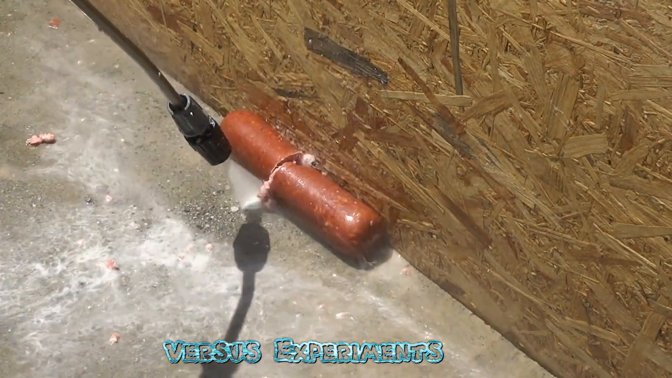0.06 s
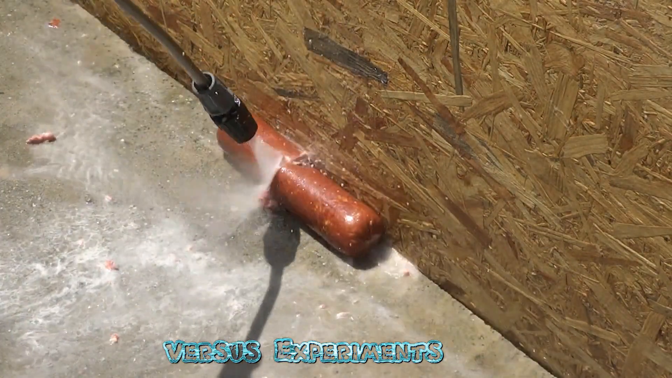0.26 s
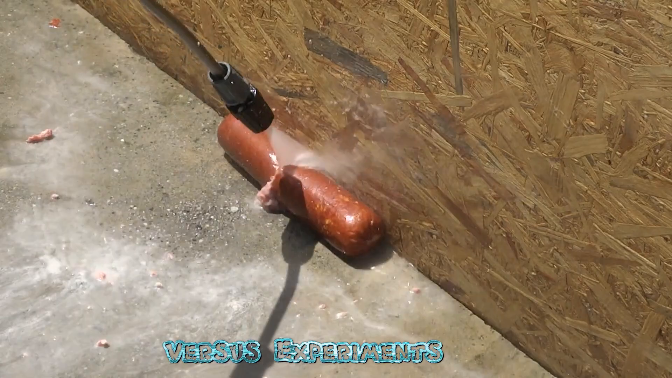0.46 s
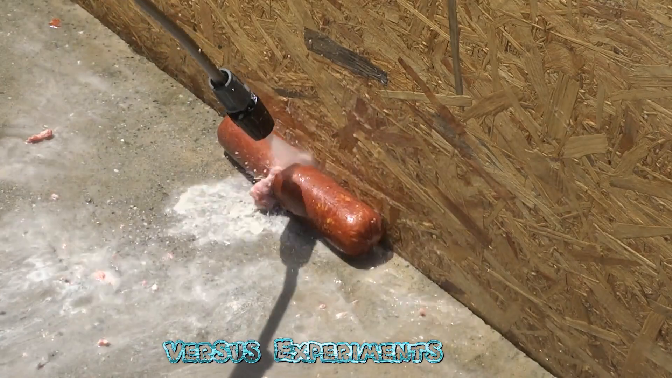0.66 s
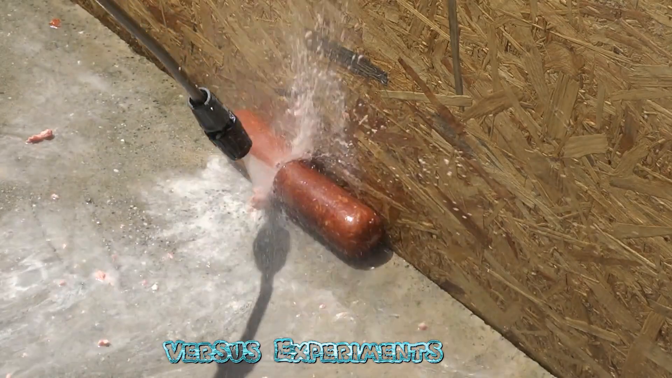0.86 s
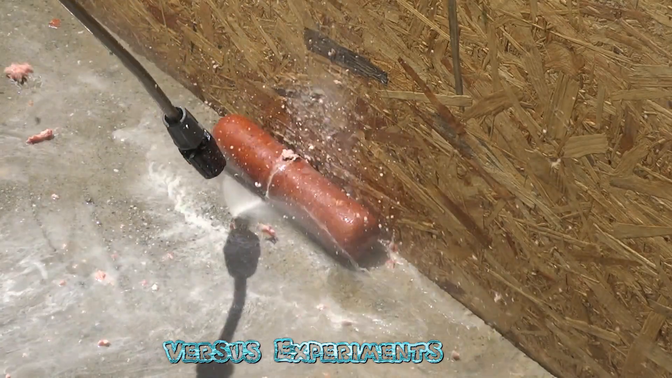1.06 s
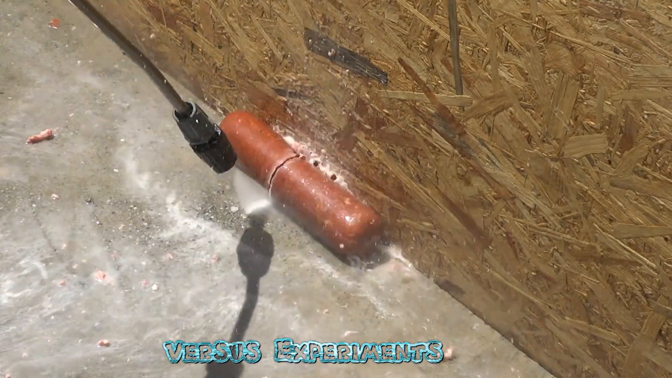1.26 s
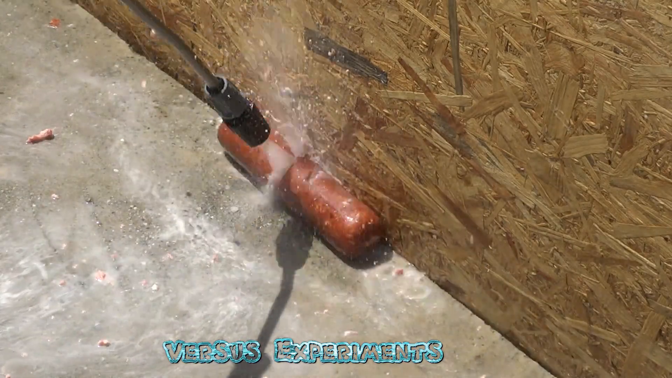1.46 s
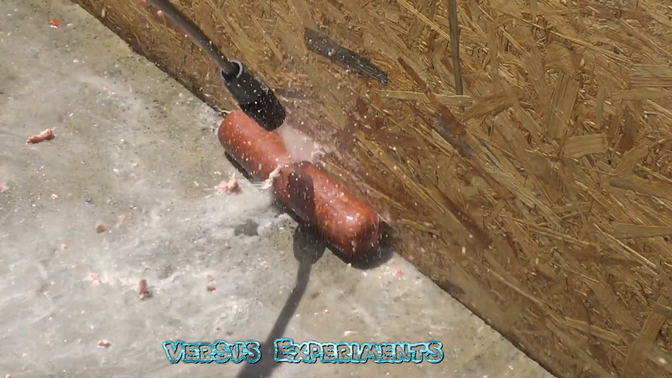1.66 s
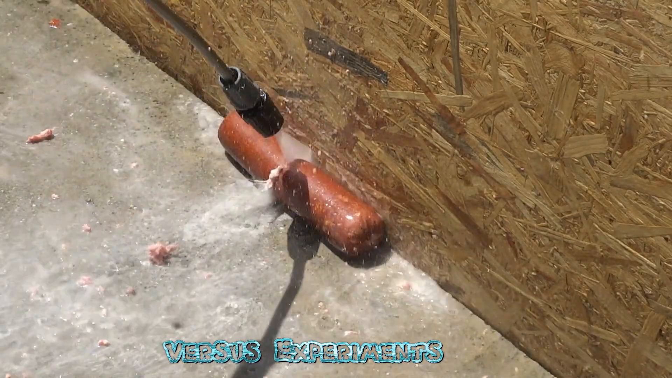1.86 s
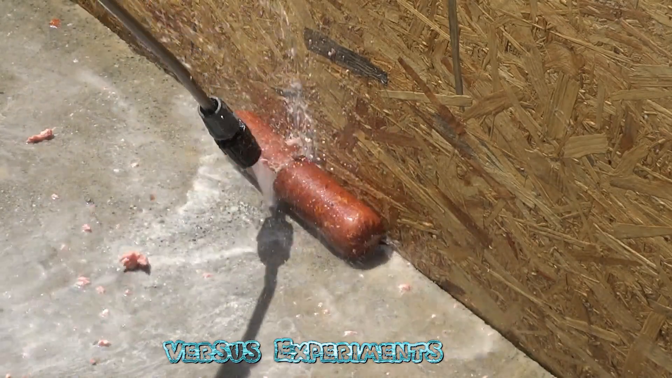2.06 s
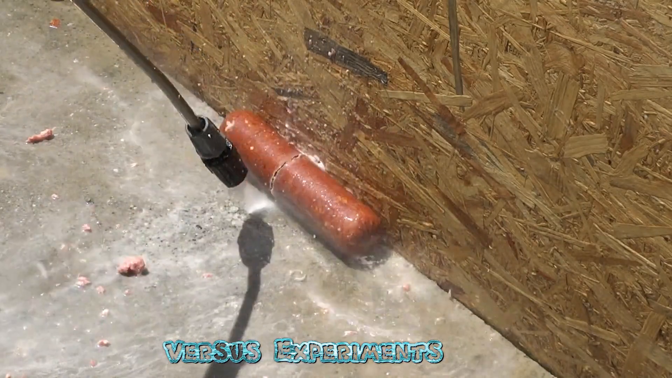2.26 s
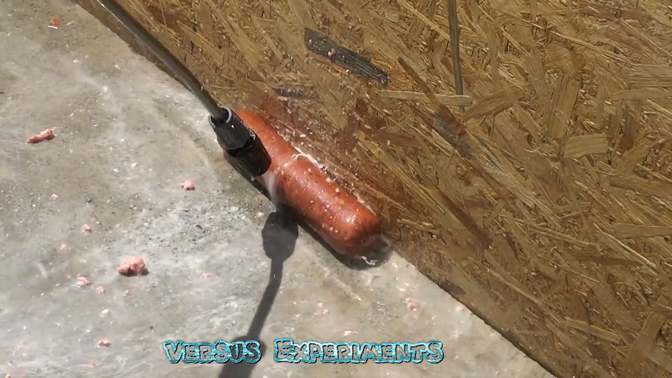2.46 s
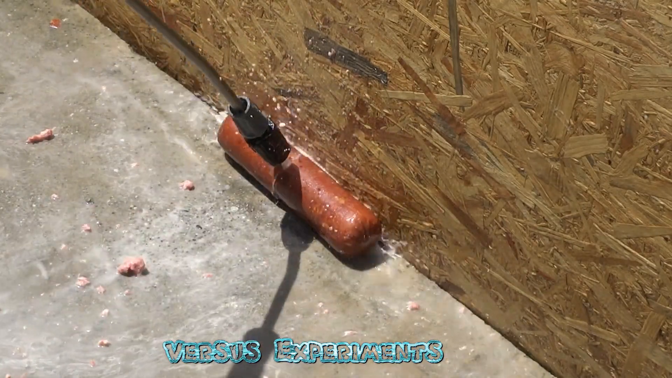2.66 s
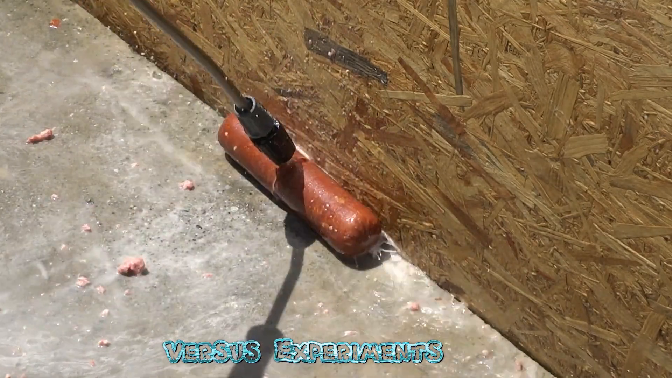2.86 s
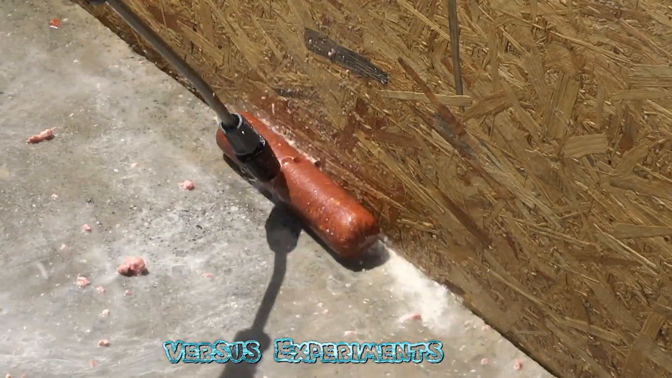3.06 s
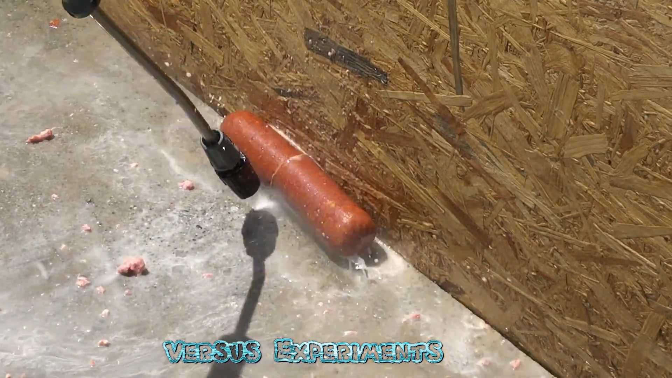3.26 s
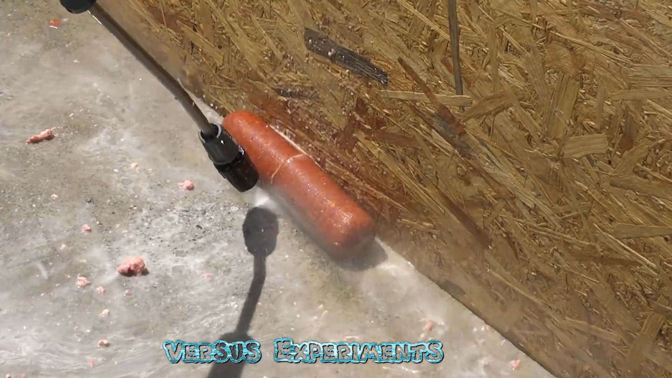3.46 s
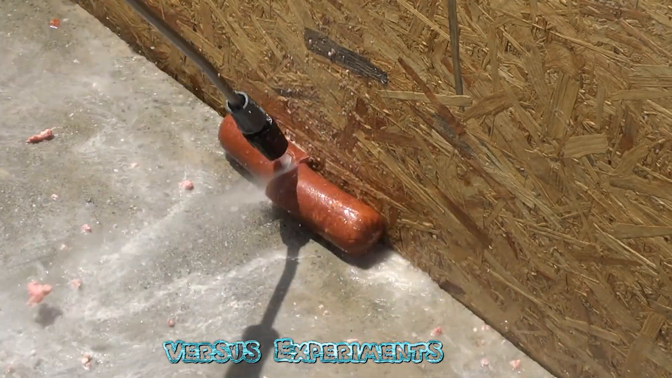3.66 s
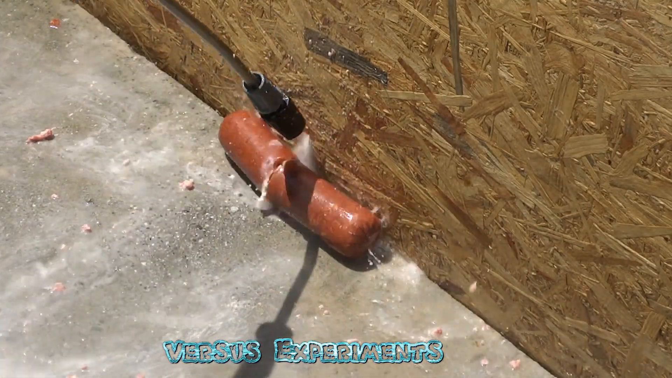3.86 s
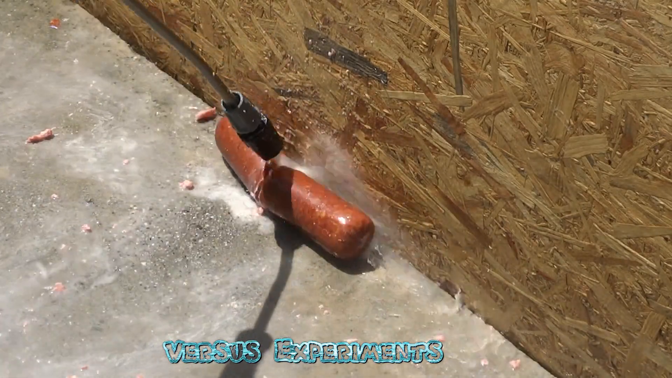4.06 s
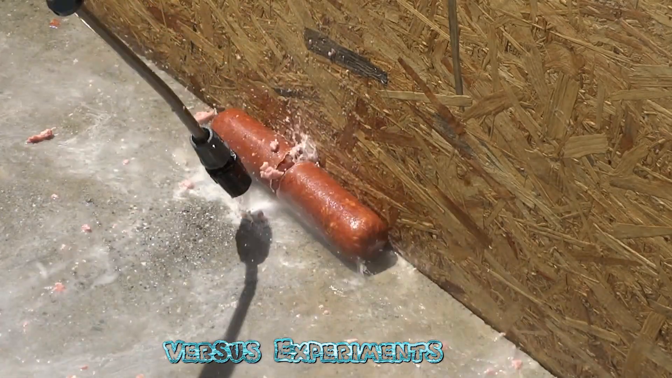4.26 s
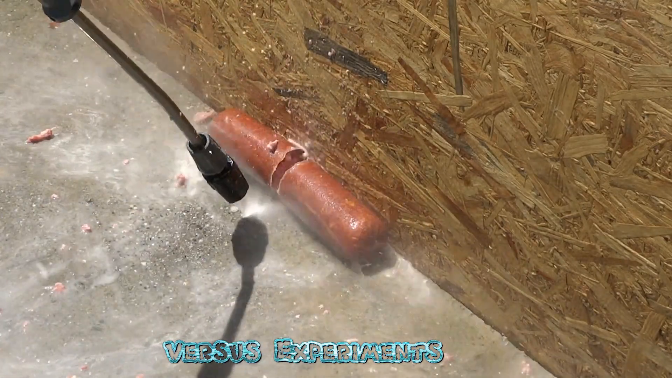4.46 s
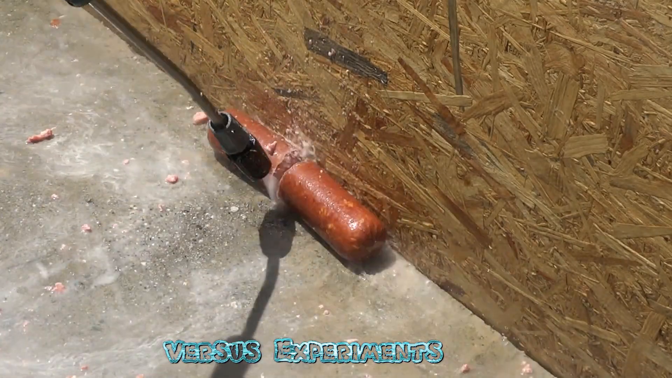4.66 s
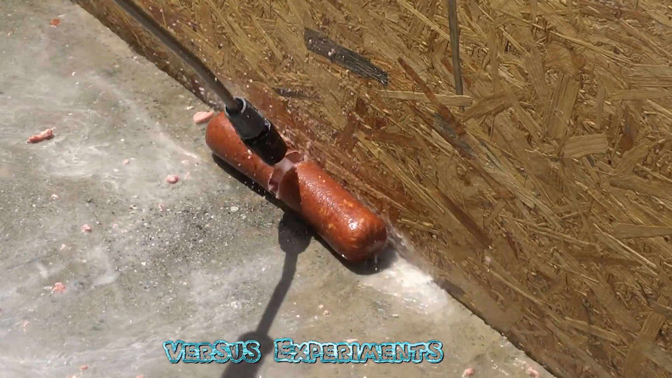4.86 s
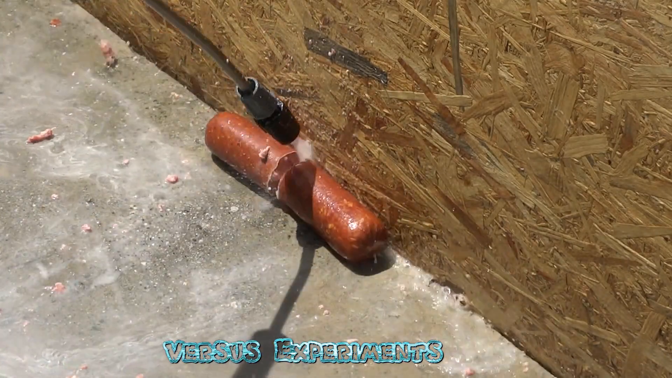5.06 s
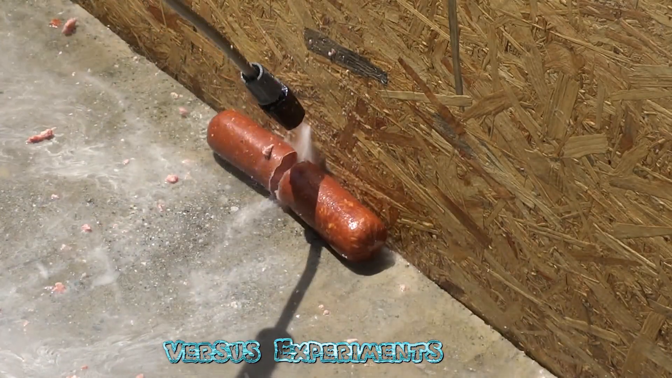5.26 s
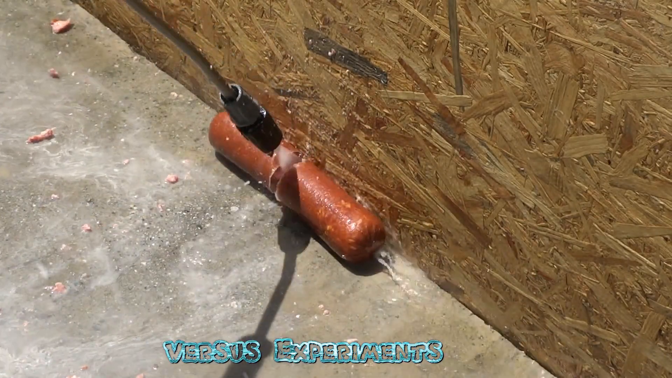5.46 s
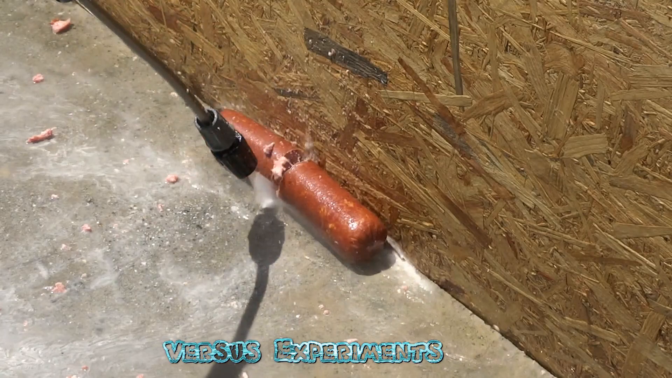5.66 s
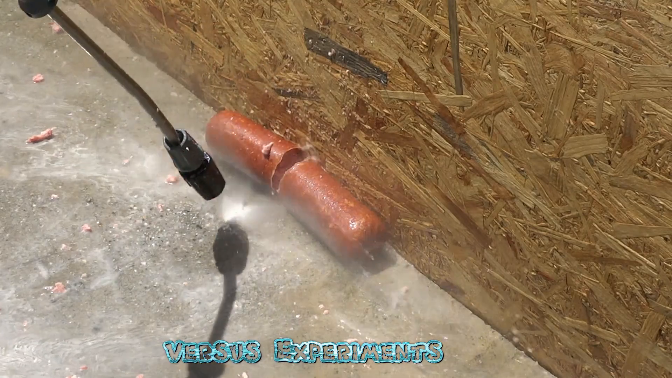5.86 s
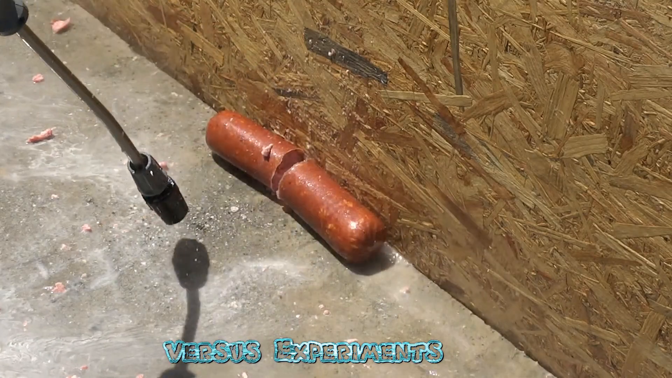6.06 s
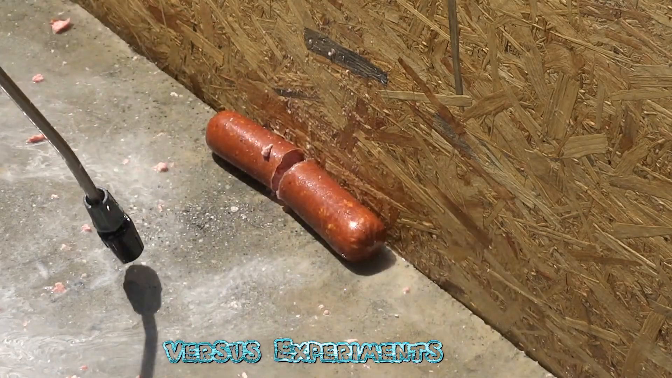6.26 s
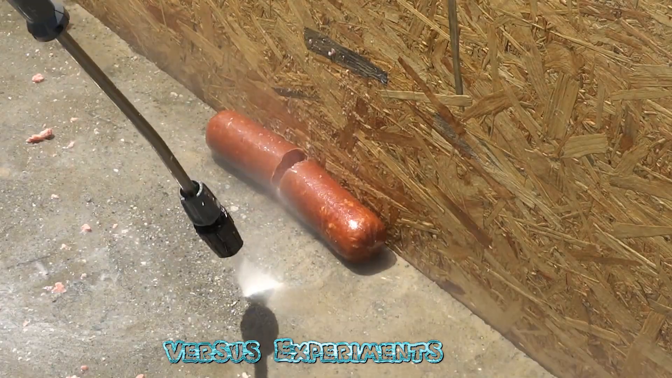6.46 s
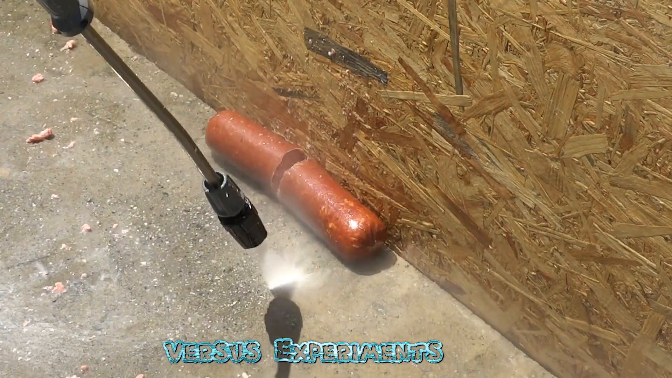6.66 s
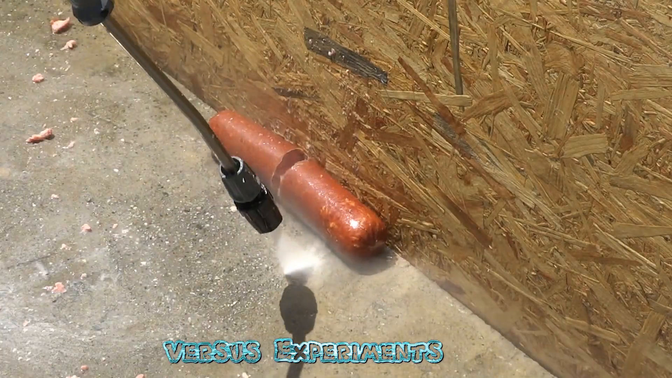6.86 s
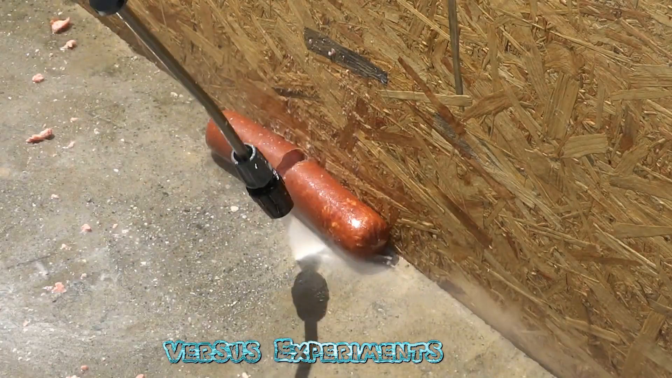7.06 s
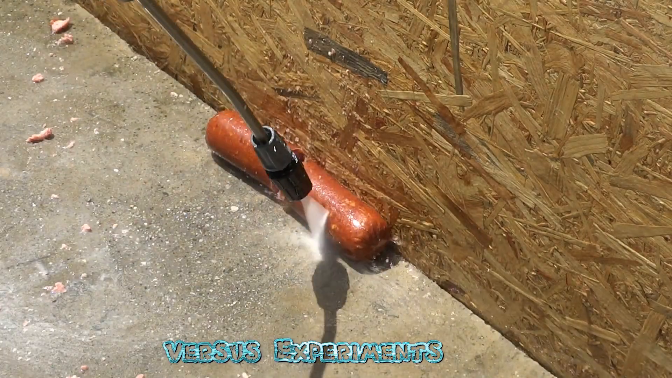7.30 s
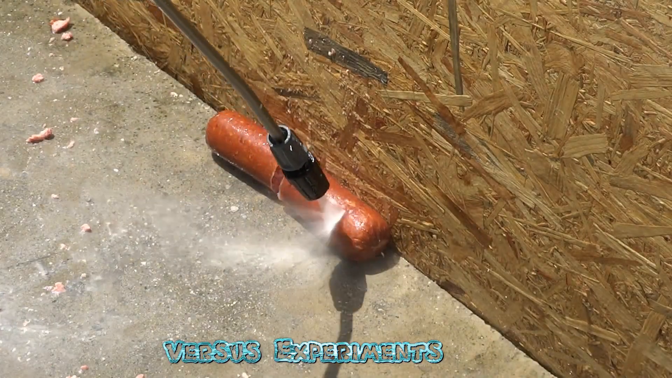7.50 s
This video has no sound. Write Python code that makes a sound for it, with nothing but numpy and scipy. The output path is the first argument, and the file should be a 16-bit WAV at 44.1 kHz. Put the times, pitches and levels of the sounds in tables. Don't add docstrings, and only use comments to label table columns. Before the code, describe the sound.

A pressure-washer jet roars hollowly into thick meat and hisses brightly on wet concrete, cuts off with a clack and faint birdsong, then snaps back.

```python
import sys
import numpy as np
from scipy import signal
from scipy.fft import irfft
from scipy.io import wavfile
from scipy.ndimage import uniform_filter1d

SR = 44100
rng = np.random.default_rng(int(sys.argv[2]) if len(sys.argv) > 2 else 0)


def pcm_store(signal):
    levels = np.round(np.clip(np.atleast_2d(signal), -1, 1) * 32767)
    wavfile.write(sys.argv[1], SR, levels.astype(np.int16).T)


def invert_db(x):
    u = np.asarray(x, float) / 20
    return 10 ** u


N = 332073
CONTROL_STEP = 40

# (frequency [Hz], density [dB per Hz])
HISS_SPECTRUM = [(1470, -31), (2500, -18), (2800, -18.5), (3190, -20), (3450, -10), (4210, -13),
                 (4540, -12.5), (6770, -4), (7420, -5.5), (8070, -2.5), (11500, -6.5), (13200, -14.5),
                 (15600, -13)]
# (frequency [Hz], density [dB per Hz])
ROAR_SPECTRUM = [(150, -66.5), (250, -22), (484, -24), (595, -14), (722, -15), (935, -6.5), (1020, -17),
                 (1200, -2), (1550, 3), (2810, -7.5), (3500, 1), (5500, -23), (7150, -40), (12100, -120)]
# (frequency [Hz], density [dB per Hz])
AIR_SPECTRUM = [(180, -35.5), (300, -9.5), (1030, -8), (1690, -4), (2100, -16.5), (3230, 2.5), (3950, -3),
                (8030, -6.5), (12000, -19), (15600, -51.5), (22000, -120)]
# (start [s], end [s], roar gain [dB], cavity pitch [Hz], mist swallowed [dB])
CUTS = [(-.1, 0.296, 9, 2540, 3.5), (0.31, 0.483, 9, 3050, 0.5), (0.456, 0.923, 14, 2390, 5.5),
        (0.902, 1.04, 7.5, 2060, 1), (1.255, 1.338, 6.5, 2800, 0), (1.329, 1.626, 17, 2030, 6.5),
        (1.621, 1.875, 15.5, 2700, 7), (1.872, 2.057, 17.5, 2130, 6), (2.05, 2.18, 14, 2140, 1.5),
        (2.35, 2.494, 12, 2800, 2.5), (2.499, 2.913, 17.5, 2280, 9), (2.92, 3.184, 15, 2380, 5),
        (3.486, 3.592, 4, 3240, -1), (3.593, 3.661, 20, 1400, 1), (3.697, 3.778, 20, 2600, 7),
        (3.81, 4.014, 10.5, 2350, 0), (4.022, 4.18, 16, 2100, 6), (4.587, 4.772, 10.5, 2580, -0.5),
        (4.773, 5.077, 12, 2140, 4.5), (5.066, 5.385, 12, 2310, 0), (5.386, 5.598, 12.5, 2240, 4),
        (5.603, 5.748, 9.5, 2300, 1), (6.4, 7.098, 3.5, 2700, 2.5), (7.1, 7.348, 8, 2480, 1)]
# (time [s], length [s], splash [dB])
SPLASHES = [(0.187, 0.13, 21), (0.575, 0.29, 15), (0.84, 0.23, 21.5), (1.387, 0.17, 13), (1.7, 0.88, 10),
            (2.04, 0.18, 14.5), (2.497, 0.2, 21), (2.73, 0.14, 8), (3.064, 0.31, 14), (3.19, .08, 10),
            (3.35, 0.35, -9.5), (3.55, 0.14, 16), (3.675, .05, -17), (3.78, 0.08, 14.5), (3.966, 0.3, 11.5),
            (4.12, .12, 8.5), (4.75, 0.27, 12), (5.15, 0.33, 3.5), (5.485, 0.23, 15.5), (7.204, 0.094, 12),
            (7.396, 0.56, 15)]
# (time [s], peak [Hz])
HISS_PEAK = [
    [(0.0, 8400), (0.85, 7780), (0.93, 8250), (1.85, 7500), (2.09, 8800), (5.41, 8030), (5.52, 7180),
     (5.61, 8520), (6.0, 8130)],
    [(6.49, 8730), (6.594, 7700), (6.814, 8850), (6.97, 7950), (7.132, 8600), (7.456, 7670), (7.53, 8000)],
]
# (time [s], delay [ms], share [0-1])
WALL_ECHO = [
    (0, 0.45, 0.15),
    (3, 0.39, 0.07),
    (6, 0.35, 0),
    (6.48, 0.478, 0.64),
    (6.7, 0.43, 0.5),
    (6.85, 0.41, 0.54),
    (7.05, 0.39, 0.25),
    (7.2, 0.38, 0.06),
    (7.53, 0.43, 0.3),
]
# (frequency [Hz], left-right difference [dB])
JET_SIDE = [(500, -21.5), (800, -23.5), (1300, -28), (1900, -23.5), (3500, -35.5), (8000, -41.5),
            (10500, -22), (14000, -33)]
# (frequency [Hz], time to fall 60 dB [s])
YARD_T60 = [(500, 0.36), (2000, 0.36), (8000, 0.37), (11000, 0.36), (14000, .25)]
# (frequency [Hz], level [dB])
YARD_COLOUR = [(500, -1), (1000, -4.5), (1700, 7.5), (2400, -10.5), (4000, 7.5), (8000, -2), (14000, -5.5)]
# (frequency [Hz], left-right difference [dB])
YARD_SIDE = [(500, -0.5), (1500, -29.5), (4400, -17.5), (14000, -18)]
# (frequency [Hz], width [Hz], level [dB])
HOSE_MODES = [(300, 220, -8), (540, 220, -7), (1200, 620, -5), (1700, 450, -2)]
# (time [s], peak level [dB], ring [Hz], share of broad crack [ratio])
CLACKS = [
    (6.044, -20, 5240, .4),
    (6.0487, -22, 6300, 0.59),
    (6.0482, -15, 5200, 0.4),
    (6.0513, -27, 5600, 1.3),
    (6.054, -21, 5200, 1.2),
    (6.058, -27, 3400, 1.6),
    (6.179, -41, 2900, .2),
    (6.3135, -47, 8000, 1.8),
    (6.421, -54, 6500, 1.8),
]
# (start [s], length [s], first pitch [Hz], last pitch [Hz], level [dB])
NOTES = [
    (6.27, .016, 3500, 4500, -66),
    (6.288, .016, 3900, 4300, -70),
    (6.306, .013, 3650, 4800, -53),
    (6.316, .018, 4750, 4300, -54),
    (6.33, .022, 4400, 2850, -51),
    (6.362, .02, 2800, 3200, -55),
    (6.374, .021, 2950, 4300, -53),
    (6.395, .011, 3500, 2900, -59),
    (6.409, .01, 2800, 2450, -68),
    (6.434, .012, 3400, 3550, -62),
]
# (time [s], pitch [Hz], level [dB])
SECOND_BIRD = [
    (6.278, 6400, -80),
    (6.29, 5840, -66),
    (6.3, 5870, -68),
    (6.312, 6200, -69),
    (6.325, 6400, -88),
]
# (time [s], level [dB])
DRUM = [
    (6.8, -57),
    (6.95, -54.5),
    (7.1, -42),
    (7.25, -45),
    (7.4, -42.5),
    (7.53, -45),
]
# (frequency [Hz], width [Hz], level [dB])
MIC_COLOUR = [(1018, 72, 7.5), (1430, 310, -4), (3746, 840, -5), (4410, 400, 3), (5480, 970, 0)]

TRIGGER_OFF_S, TRIGGER_ON_S = 6.009, 6.4835
ENTRY_S, MIST_ENTRY_S = 0.039, 0.015
CONCRETE_HISS_DB, CONCRETE_MIST_DB, CONCRETE_SPLASH_DB = -17, -11.5, -17
CONCRETE_ROAR_DB, CONCRETE_CAVITY_HZ = -38, 2800
HISS_LOST_PER_ROAR, HISS_LOST_PER_SPLASH, MIST_LOST = 0.04, 0.068, 1.38
PEAK_SAG_HZ_PER_DB = 46.5
HOLLOW_DB, HOLLOW_PER_ROAR, HOLLOW_DB_PER_OCTAVE = -8.5, -0.15, -6.5
EDGE_DB, EDGE_PER_SPLASH, EDGE_DB_PER_OCTAVE = 3.5, 0.15, 10.5
YARD_DB, AIR_DB, RUMBLE_DB = -18, -69.5, -64
DRIBBLE_DB, DRIBBLE_HOLD_S, DRIBBLE_FADE_DB_PER_S = -50, 0.055, 150
MIC_LOW_HZ, TOP_HZ = 400, 15780
LEVELLER_DB, LEVELLER_SHARE, LEVELLER_S = -17.5, 0.43, 0.052


def rms_one(x):
    return x / np.sqrt(np.mean(x ** 2) + 1e-20)


def in_time(rows):
    s, *columns = np.transpose(rows)
    return [np.interp(np.arange(N) / SR, s, column) for column in columns]


def at_hz(points, hz):
    table_hz, value = np.transpose(points)
    return np.interp(np.log(hz), np.log(table_hz), value)


def fill(slow):
    return np.interp(np.arange(N) / CONTROL_STEP, np.arange(len(slow)), slow)


def drift(rate_hz):
    r = np.exp(-2 * np.pi * rate_hz * CONTROL_STEP / SR)
    white = rng.standard_normal(N // CONTROL_STEP + 2001)
    settled = signal.lfilter([1], [1, -2 * r, r * r], white)[2000:]
    return rms_one(settled)


def turbulence(spectrum, tilts, patch_db, surge_db, count):
    edges = np.geomspace(spectrum[0][0], min(spectrum[-1][0], 17500), count + 1)
    tilts = [[np.broadcast_to(v, N)[::CONTROL_STEP] for v in tilt] for tilt in tilts]
    white = rng.standard_normal((2, N))
    surge = drift(43) + 0.27 * drift(32)
    neighbour = drift(9)
    out, power = 0, 0
    for k, (low, high) in enumerate(zip(edges, edges[1:])):
        band_filter = signal.butter(2, [low, high], "band", fs=SR, output="sos")
        band = signal.sosfilt(band_filter, white[k % 2])
        hz, own = np.sqrt(low * high), drift(9.4)
        base_db = at_hz(spectrum, hz)
        tilt_db = sum(db * np.exp(-np.abs(np.log2(hz / centre) / wide) ** 2.1) for centre, wide, db in tilts)
        flicker_db = patch_db * (own + neighbour) + surge_db * surge
        out = out + band * fill(invert_db(base_db + tilt_db + flicker_db))
        power = power + np.mean(band ** 2) * invert_db(base_db) ** 2
        neighbour = own
    return out / np.sqrt(power)


def resonant_noise(modes):
    white = rng.standard_normal(N)
    out = 0
    for hz, width_hz, db in modes:
        ring = signal.iirpeak(hz, hz / width_hz, fs=SR)
        out = out + invert_db(db) * signal.lfilter(*ring, signal.lfilter(*ring, white))
    return rms_one(out)


def passes():
    t = np.arange(N // CONTROL_STEP + 1) * CONTROL_STEP / SR
    start, end, gain_db, hz, mist_db = np.transpose(CUTS)[:, :, None]
    inside = (np.tanh((t - start) / ENTRY_S) - np.tanh((t - end) / ENTRY_S)) / 2
    covered = (np.tanh((t - start) / MIST_ENTRY_S) - np.tanh((t - end) / MIST_ENTRY_S)) / 2
    roar_gain = np.sum(inside * gain_db, axis=0)
    cavity = CONCRETE_CAVITY_HZ + np.sum(inside * (hz - CONCRETE_CAVITY_HZ), axis=0)
    swallowed = np.sum(covered * mist_db, axis=0)
    s, length, splash_db = np.transpose(SPLASHES)[:, :, None]
    splash = np.sum(splash_db * np.exp(-(2 * (t - s) / length) ** 2), axis=0)
    return [fill(v) for v in (roar_gain, cavity, swallowed, splash)]


def roar():
    gain_db, cavity_hz, _, splash_db = passes()
    octaves = np.log2(cavity_hz / CONCRETE_CAVITY_HZ)
    hollow_db = HOLLOW_DB + HOLLOW_PER_ROAR * gain_db + HOLLOW_DB_PER_OCTAVE * octaves
    edge_db = EDGE_DB + EDGE_DB_PER_OCTAVE * octaves + EDGE_PER_SPLASH * splash_db
    tilts = [(650, 0.8, hollow_db + 10), (3300, 0.4, edge_db + 1.5), (cavity_hz, 0.3, 5)]
    churn = turbulence(ROAR_SPECTRUM, tilts, patch_db=0.9, surge_db=0.95, count=24)
    return invert_db(CONCRETE_ROAR_DB + gain_db + 2.5) * churn


def hiss():
    gain_db, _, swallowed_db, splash_db = passes()
    hiss_db = CONCRETE_HISS_DB - HISS_LOST_PER_ROAR * gain_db - HISS_LOST_PER_SPLASH * splash_db
    lance_hz = in_time(HISS_PEAK[0] + HISS_PEAK[1])[0]
    peak_hz = lance_hz - PEAK_SAG_HZ_PER_DB * (swallowed_db - swallowed_db.mean())
    mist_db = CONCRETE_MIST_DB - MIST_LOST * swallowed_db
    spray_db = 0.46 * (CONCRETE_SPLASH_DB + splash_db + 7.5)
    tilts = [(16000, 0.62, mist_db + 5), (4900, 0.4, spray_db), (peak_hz, 0.1, 4)]
    return invert_db(hiss_db + 3) * turbulence(HISS_SPECTRUM, tilts, patch_db=0.9, surge_db=0.39, count=26)


def trigger():
    t = np.arange(N) / SR
    before_pause = 1 / (1 + np.exp(np.clip((t - TRIGGER_OFF_S) / 0.0028, -50, 50)))
    after_pause = 1 / (1 + np.exp(np.clip((TRIGGER_ON_S - t) / 0.00072, -50, 50)))
    return before_pause + after_pause


def off_wall(x):
    delay_ms, share = in_time(WALL_ECHO)
    dull = signal.filtfilt(*signal.butter(2, 6500, fs=SR), x)
    late = np.interp(np.arange(N) - delay_ms * SR / 1000, np.arange(N), dull)
    return x + share * late


def spread(x):
    hz = np.arange(257) * SR / 512 + 1
    scatter = irfft(invert_db(at_hz(JET_SIDE, hz)) * np.exp(2j * np.pi * rng.random(257)))
    return x + signal.fftconvolve(x, scatter)[:N] * [[1], [-1]]


def yard(x):
    f, s, cells = signal.stft(rng.standard_normal((2, SR // 2)), SR, nperseg=256)
    decay_db = 60 * s / at_hz(YARD_T60, f + 1)[:, None]
    cells = cells * invert_db(at_hz(YARD_COLOUR, f + 1)[:, None] - decay_db)
    cells[1] *= invert_db(at_hz(YARD_SIDE, f + 1))[:, None]
    tails = signal.istft(cells, SR, nperseg=256)[1]
    tails = tails / np.sqrt(np.sum(tails[0] ** 2))
    mid, side = signal.fftconvolve(x[None], tails, axes=1)[:, :N]
    return mid + side * [[1], [-1]]


def open_air():
    air = invert_db(AIR_DB) * turbulence(AIR_SPECTRUM, [], patch_db=1.2, surge_db=0.2, count=12)
    unrelated = air[::-1]
    return air + invert_db(-2.0) * unrelated * [[1], [-1]]


def dribble():
    since = np.arange(N) / SR - TRIGGER_OFF_S
    level_db = DRIBBLE_DB - DRIBBLE_FADE_DB_PER_S * np.maximum(since - DRIBBLE_HOLD_S, 0)
    return (since > 0) * invert_db(level_db + fill(2.5 * drift(25))) * resonant_noise(HOSE_MODES)


def clacks():
    out, t = np.zeros(N), np.arange(900) / SR
    crack_band = signal.butter(2, [2500, 11000], "band", fs=SR)
    cracks = signal.lfilter(*crack_band, rng.standard_normal((len(CLACKS), 900)))
    body = 0.32 * np.sin(2 * np.pi * 1350 * t)
    swell = t / 0.00058 * np.exp(-t / 0.00053)
    for (s, peak_db, hz, share), crack in zip(CLACKS, cracks):
        ring = np.sin(2 * np.pi * hz * t) + body + share * crack
        first = round(s * SR)
        out[first:first + 900] += invert_db(peak_db + 4) * ring * swell
    return signal.sosfilt(signal.butter(4, 9500, fs=SR, output="sos"), out)


def songbird(rough):
    out, flutter = np.zeros(N), 1 + rough * fill(drift(150))
    for s, length, first_hz, last_hz, level_db in NOTES:
        part = np.linspace(0, 1, round(length * SR))
        glide_hz = first_hz + (last_hz - first_hz) * part
        note = np.sin(np.pi * part) * np.sin(2 * np.pi * np.cumsum(glide_hz) / SR)
        first = round(s * SR)
        out[first:first + len(part)] += np.sqrt(2) * invert_db(level_db) * note
    return out * flutter


def second_bird(rough):
    start = (SECOND_BIRD[0][0] - 0.01, SECOND_BIRD[0][1], -140)
    end = (SECOND_BIRD[-1][0] + 0.01, SECOND_BIRD[-1][1], -140)
    hz, level_db = in_time([start] + SECOND_BIRD + [end])
    flutter = 1 + rough * fill(drift(130))
    return np.sqrt(2) * invert_db(level_db) * flutter * np.sin(2 * np.pi * np.cumsum(hz) / SR)


def board():
    level_db, = in_time([(6.6, -120)] + DRUM)
    return invert_db(level_db) * resonant_noise([(1070, 350, 0.1)])


def scene():
    jet = off_wall(trigger() * (roar() + hiss()))
    near = jet + dribble() + board()
    knocks = clacks()
    birds = songbird(rough=0.1) + second_bird(rough=1.4)
    direct = spread(near + knocks) + birds
    echoes = invert_db(YARD_DB) * yard(near + 0.33 * knocks) + invert_db(-5) * yard(birds)
    return direct + echoes + open_air()


def leveller(x):
    power = uniform_filter1d(x[0] ** 2, size=round(LEVELLER_S * SR))
    level_db = 10 * np.log10(power + 1e-12)
    return x * invert_db(-LEVELLER_SHARE * np.maximum(level_db - LEVELLER_DB, 0))


def top_cut(x):
    return signal.sosfilt(signal.butter(12, 16240, fs=SR, output="sos"), x)


def record(dry):
    cut = signal.sosfilt(signal.butter(5, MIC_LOW_HZ, "high", fs=SR, output="sos"), dry)
    cut = signal.sosfilt(signal.ellip(10, 0.3, 55, TOP_HZ, fs=SR, output="sos"), cut)
    for hz, width_hz, db in MIC_COLOUR:
        cut = cut + (invert_db(db) - 1) * signal.lfilter(*signal.iirpeak(hz, hz / width_hz, fs=SR), cut)
    cut = leveller(invert_db(1.0) * cut)
    rumble = rms_one(signal.lfilter(*signal.butter(2, 380.0, fs=SR), rng.standard_normal(N)))
    loudness = np.sqrt(uniform_filter1d(cut[0] ** 2, size=800) + 1e-12)
    spill = invert_db(RUMBLE_DB + 11) * rumble * loudness ** 0.68
    mix = 1.608 * np.tanh((cut + spill) / 1.587)
    return top_cut(mix)


dry = scene()
out = record(dry)
pcm_store(out)
```